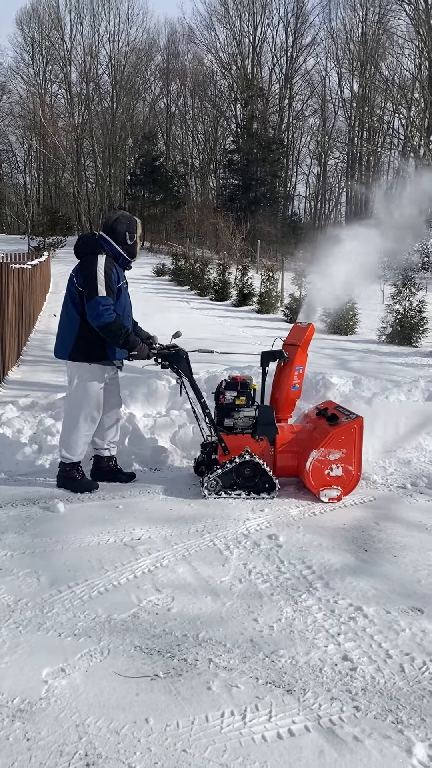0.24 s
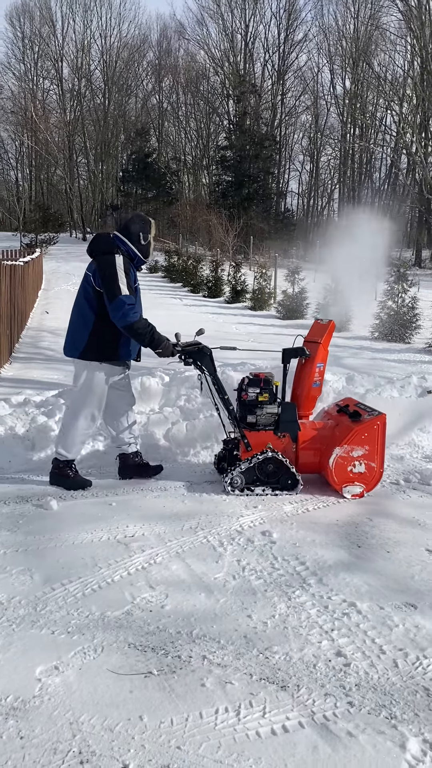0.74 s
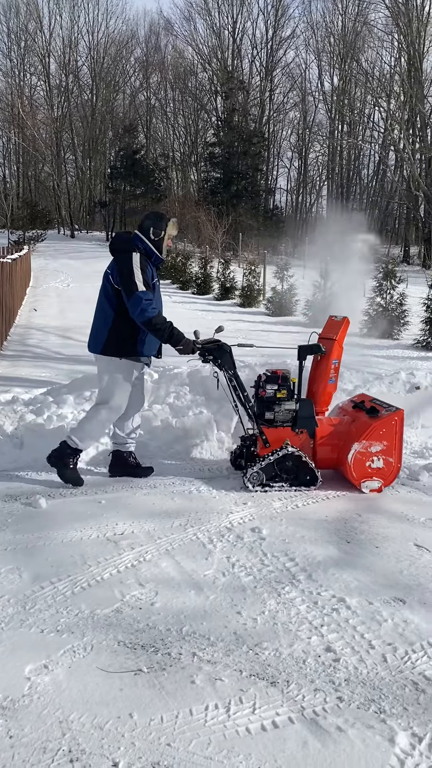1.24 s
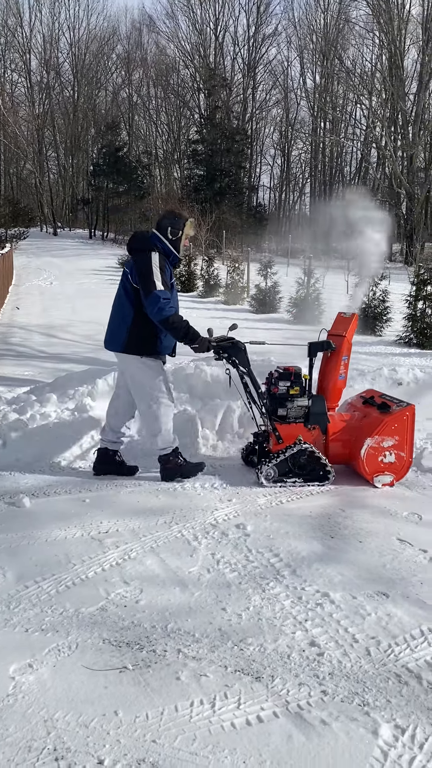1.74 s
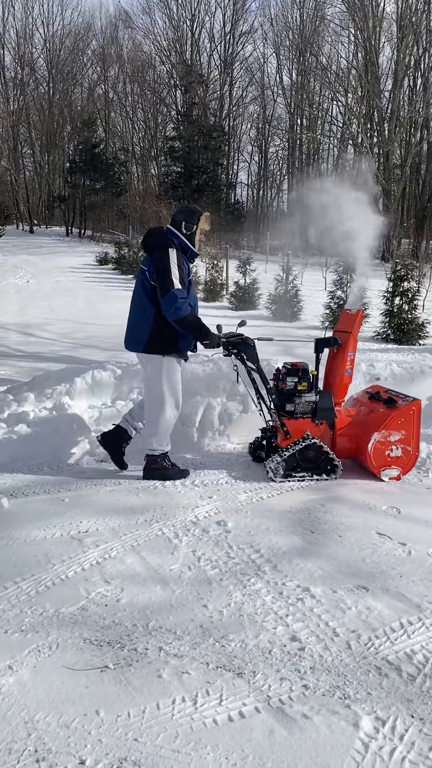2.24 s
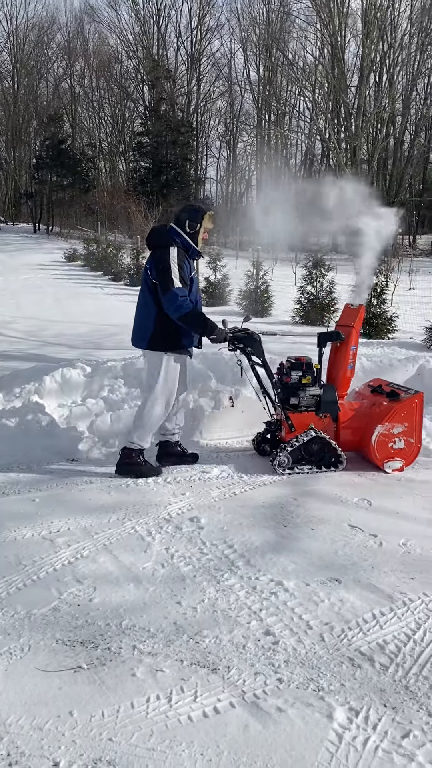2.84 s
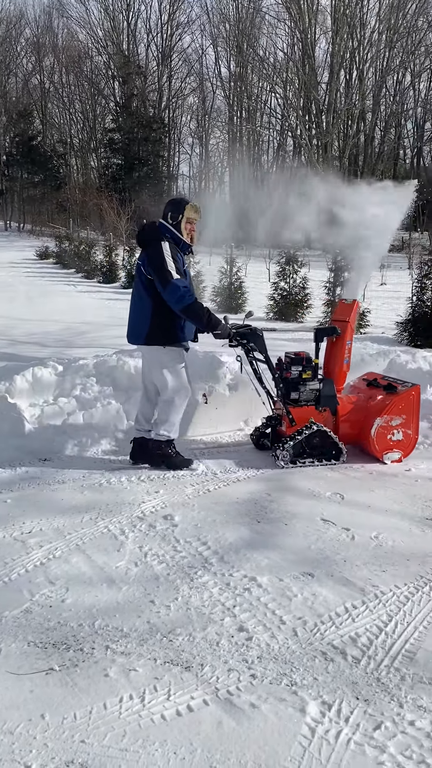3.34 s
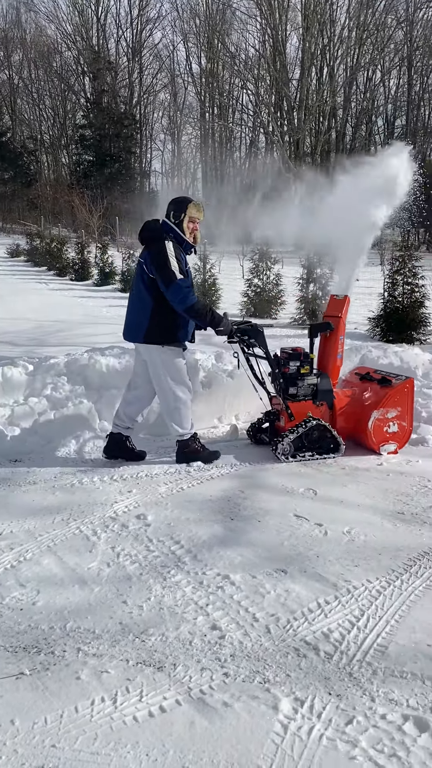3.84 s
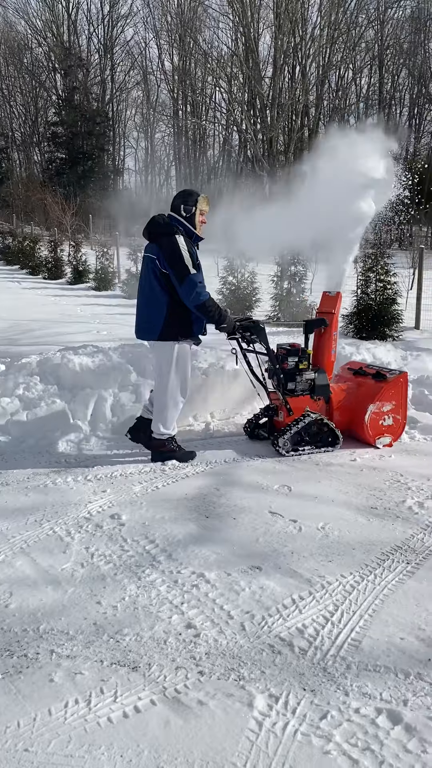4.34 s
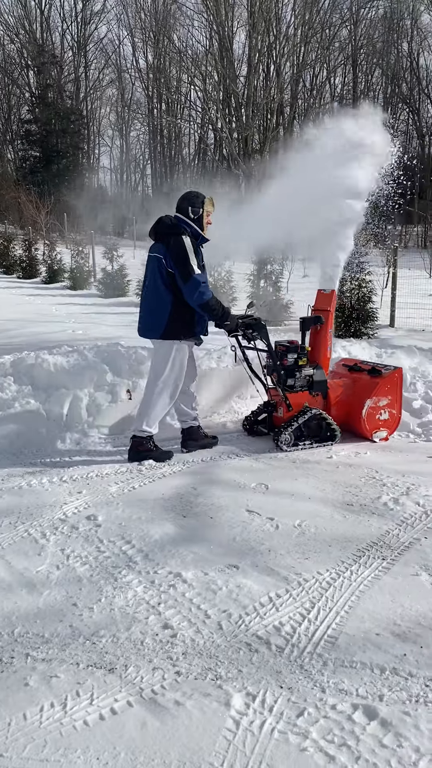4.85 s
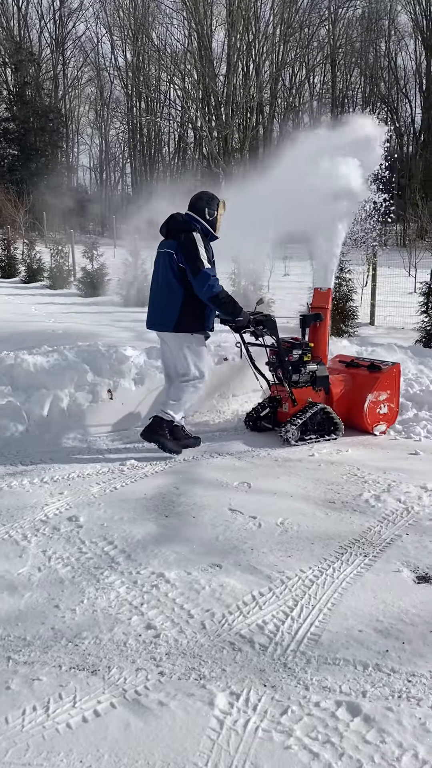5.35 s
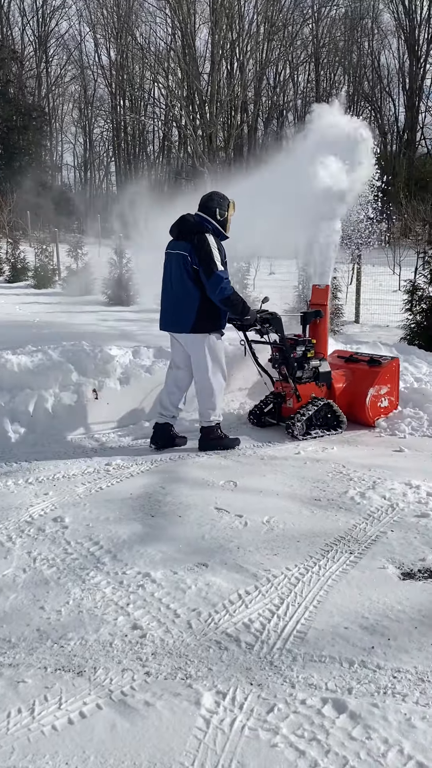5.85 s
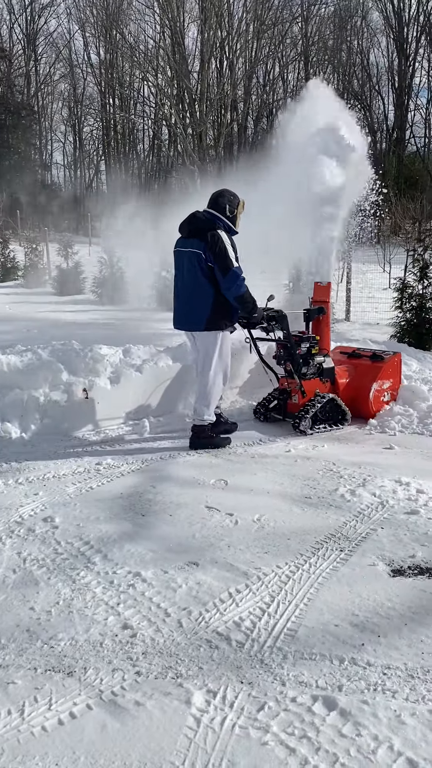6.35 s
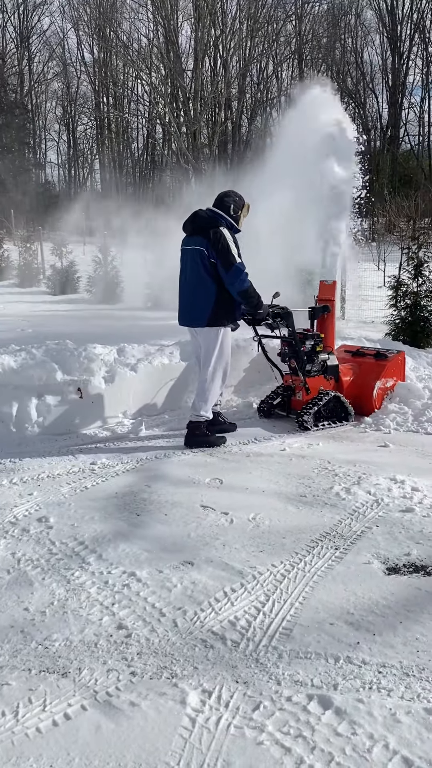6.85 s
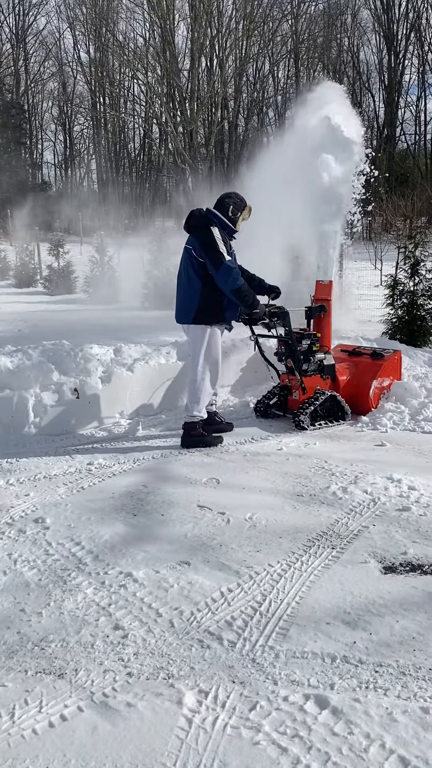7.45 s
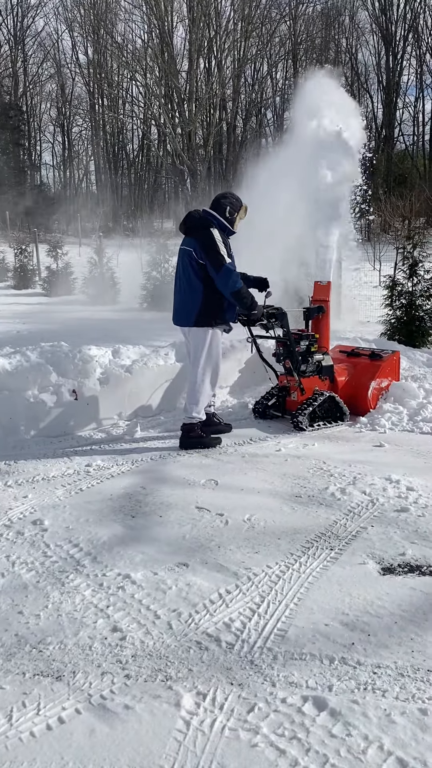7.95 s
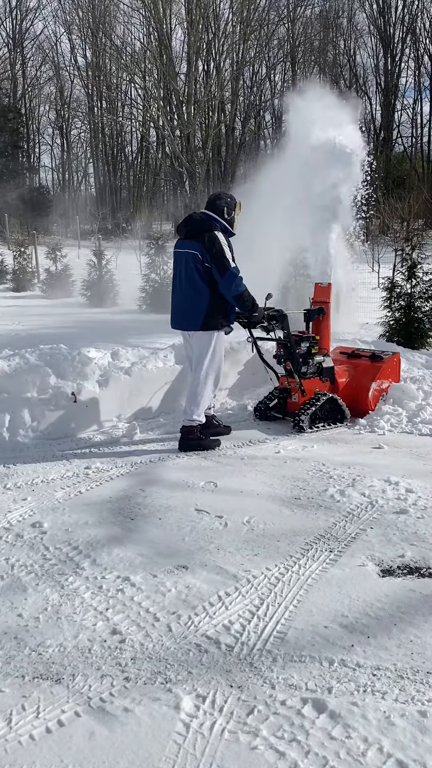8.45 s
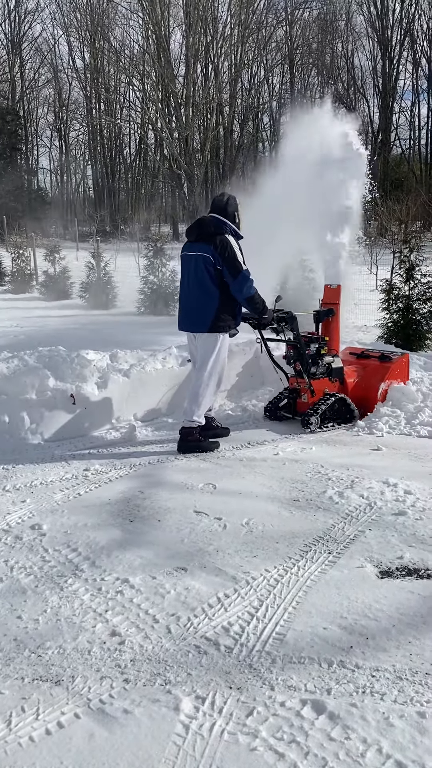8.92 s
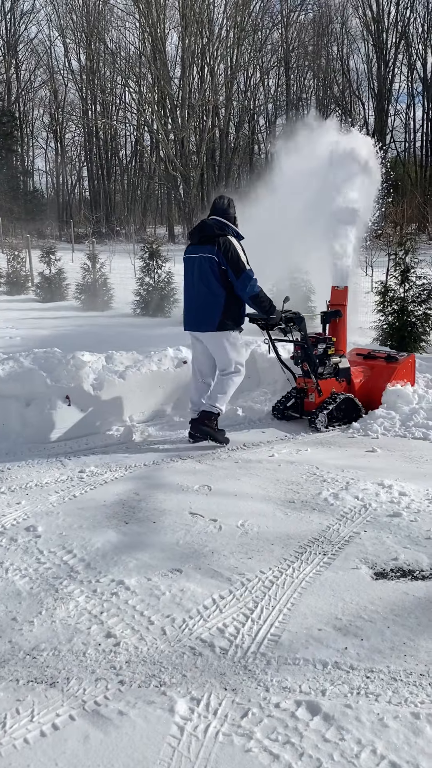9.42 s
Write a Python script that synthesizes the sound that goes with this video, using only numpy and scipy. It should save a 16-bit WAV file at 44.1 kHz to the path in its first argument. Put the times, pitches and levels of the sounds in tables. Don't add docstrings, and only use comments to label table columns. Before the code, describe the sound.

A single-cylinder snowblower throbs and clatters steadily outdoors, laboring louder as it digs into deeper snow, with hissing spray and sharp ice ticks on steel.

```python
import sys
import numpy as np
from scipy import signal
from scipy.fft import rfft, irfft, next_fast_len
from scipy.io import wavfile
from scipy.ndimage import uniform_filter1d, map_coordinates

SR = 44100
rng = np.random.default_rng(int(sys.argv[2]) if len(sys.argv) > 2 else 0)


def wav_out(sig):
    wavfile.write(sys.argv[1], SR, np.round(np.clip(np.atleast_2d(sig).T, -1, 1) * 32767).astype(np.int16))


def boost(x):
    u = np.asarray(x, float) / 20
    return 10 ** u


N = 426888
SIZE = next_fast_len(N + SR)
HZ = np.arange(SIZE // 2 + 1) * SR / SIZE + 1e-3


def rms_one(x):
    return x / np.sqrt(np.mean(x ** 2) + 1e-20)


def in_time(rows):
    seconds, *columns = np.transpose(rows)
    return [np.interp(np.arange(N) / SR, seconds, column) for column in columns]


def at_hz(points):
    points = np.array(points)
    return np.interp(np.log(HZ), np.log(points[:, 0]), points[:, 1])


def shape(x, gain):
    return irfft(rfft(x, SIZE) * gain, SIZE)[..., :N]


def coloured(x, points):
    return rms_one(shape(x, boost(at_hz(points))))


def drift(rate):
    knots = rng.standard_normal(800)
    at = np.arange(0, N + 64, 64)
    place = 5 + at / SR * np.clip(rate, .1, 70)
    return np.interp(np.arange(N), at, map_coordinates(knots, [place], order=3))


def resonate(x, hz, width):
    r = np.exp(-np.pi * width / SR)
    top = np.array([1, 0, -1]) * (1 - r * r) / 2
    bottom = [1, -2 * r * np.cos(2 * np.pi * hz / SR), r * r]
    return signal.lfilter(top, bottom, x)


def puff(cycle, at, decay, uneven_db):
    since = cycle - at
    strength = boost(uneven_db * rng.standard_normal(400))[np.floor(since).astype(int) + 2]
    part = since % 1
    return strength * np.minimum(part / 0.037, 1) * np.exp(-part / decay)


def swell(middle, half):
    return np.exp(-((np.arange(N) / SR - middle) / half) ** 2)


def muffler(cycle, rate, level_db, stage):
    # (multiple of firing rate, light work [dB], labouring [dB], deep snow [dB])
    multiples = [(1, -25.5, -36, -24), (2, -1, 1, 4), (3, -10, 2.5, 0.5), (4, -27, -2.5, -3.5),
                 (5, -3, -5, -1.5), (6, 0.5, -6, -5.5), (7, -2.5, -18, -5.5), (8, -13.5, -0.5, -7.5),
                 (9, -8, -9, -2.5), (10, -12, -9, -15), (11, -15, -37, -23), (12, -18, -25, -17),
                 (14, -19.5, -20.5, -37), (15, -31, -18, -14), (16, -36, -12.5, -25),
                 (17, -21.5, -14, -14.5), (18, -23, -14, -14), (19, -43, -12.5, -22), (20, -33, -19, -19),
                 (21, -17, -38, -30), (22, -13.5, -45, -30), (24, -15, -31, -39), (25, -20, -25, -27),
                 (26, -14, -37, -42), (27, -18.5, -37, -35), (28, -27, -35, -35), (29, -11.5, -32, -35)]
    # (frequency [Hz], half width [Hz], lift [dB])
    pipe = [(250.8, 13, 6), (485.5, 11, 2.5)]
    # (frequency [Hz], phase [radians])
    muffler_lead = [(50, 0), (92, 0), (105, 1.5), (128, -1.3), (203, 6.5), (225, 5.7), (265, 7.5),
                    (900, 40)]
    # (frequency [Hz], level [dB])
    rumble_colour = [(30, -26), (50, -3.5), (100, -3.5), (200, 1.5), (270, -1), (340, -12), (500, -20),
                     (900, -42)]
    tone = np.zeros(N)
    for order, *by_stage in multiples:
        order = round(order)
        order_db = np.interp(stage, [0, 1, 2], by_stage)
        order_db = order_db + sum(db / (1 + ((order * rate - hz) / width) ** 2) for hz, width, db in pipe)
        loose = min(.25 + .05 * order, .75)
        lead = np.interp(order * rate, *np.transpose(muffler_lead))
        lead += .3 * max(order - 10, 0) ** 2
        phase = 2 * np.pi * order * cycle + lead + .4 * loose * drift(5.0)
        tone += boost(order_db + 2.6 * loose * drift(5.0)) * np.cos(phase)
    power = uniform_filter1d(tone ** 2, SR // 3)
    gate = (.5 + 0.7 * puff(cycle, 0.586, 0.23, 2.5)) * boost(1.5 * drift(5.0))
    rumble = coloured(rng.standard_normal(N) * gate, rumble_colour)
    return boost(level_db) * (tone / np.sqrt(power) + boost(-8.0) * rumble)


def casing(cycle, level_db):
    # (frequency [Hz], level [dB])
    clatter_colour = [(250, -21), (330, -7), (440, -4), (600, -5.5), (820, -2), (1000, -3.5), (1100, -6.5),
                      (1600, -10.5), (2200, -14), (3050, -17), (3600, -19.5), (6000, -25.5), (10000, -43)]
    # (frequency [Hz], width [Hz], level [dB])
    panel_rings = [(2274, 22, -45.5), (2710, 100, -44), (3197, 120, -47), (3710, 300, -46.5),
                   (4210, 80, -60)]
    gate = 0.98 + 1.1 * puff(cycle, 0.529, 0.1, 4.8)
    gate += 0.33 * puff(cycle, 0.46, 0.053, 6.8)
    gate += 0.45 * puff(cycle, 0.3, 0.19, 2.6)
    shaken = rms_one(gate * rng.standard_normal((2, N)) * boost(0.58 * drift(12.0)))
    rings = 0
    for hz, width, db in panel_rings:
        rings = rings + boost(db) * rms_one(resonate(resonate(shaken, hz, width), hz, width))
    return boost(level_db + 4.5) * coloured(shaken, clatter_colour) + boost(level_db + 26.5) * rings


def rasp(cycle, level_db, stage):
    # (frequency [Hz], level [dB])
    gas_colour = [(300, -22), (470, -4.5), (600, -2.5), (950, -5.5), (1100, -8.5), (1250, 2.5), (1900, -10),
                  (2800, -5.5), (3400, -10), (4600, -10), (6500, -13), (9000, -17.5), (11000, -19),
                  (16000, -22)]
    load = np.clip(stage - .15, .05, .85)
    beats = 0.7 * puff(cycle, 0.1, 0.056, 2.2)
    beats += 1.2 * puff(cycle, 0.26, 0.17, 2.2) + 1.63 * puff(cycle, 0.365, 0.14, 2.0)
    gate = (.58 - 0.42 * load + load * beats) * boost(1.1 * drift(45.0))
    return boost(level_db + 2.5) * coloured(gate * rng.standard_normal((2, N)), gas_colour)


def spray(level_db):
    # (frequency [Hz], level [dB])
    snow_colour = [(1500, 5), (3000, 5.5), (5000, 0), (7500, 0), (11000, -4), (13000, -7), (16000, -24)]
    hits = rng.random(N) < 900.0 / SR
    grain = boost(4.0 * np.minimum(rng.exponential(1, N), 4)) * rng.choice([-1, 1], N)
    hiss = rng.standard_normal(N) + .5 * rms_one(hits * grain)
    clumps = boost(3.7 * drift(29.0) + 0.63 * drift(40.0))
    return boost(level_db + 5.5) * coloured(hiss * clumps, snow_colour)


def wind():
    # (middle [s], half length [s], level [dB])
    gusts = [(.18, .1, -34), (.72, .07, -42), (1.052, 0.076, -32), (1.3, 0.13, -38), (1.7, 0.16, -29),
             (1.93, .08, -35), (2.4, 0.19, -40), (3.0, 0.19, -32), (3.52, .07, -41), (4.27, 0.11, -42),
             (4.98, .07, -40), (5.3, .13, -44), (5.62, .04, -37), (6.08, .1, -38), (7.05, .1, -31),
             (7.28, .13, -35), (7.66, 0.15, -24), (7.85, 0.11, -26), (8.042, .08, -27), (8.4, 0.089, -28),
             (8.72, .11, -29), (9.0, 0.21, -37), (9.47, .04, -52)]
    calm_db = -68
    level = boost(calm_db) + sum(boost(db) * swell(middle, half) ** 2 for middle, half, db in gusts)
    low = boost(at_hz([(20, -22), (45, 0), (90, 0), (160, -5), (300, -15), (700, -40), (2500, -90)]))
    left, right, both = (rms_one(shape(rng.standard_normal(N) * boost(5.0 * drift(25.0)), low)) for _ in range(3))
    return level * (np.array([left, right]) + 1.9 * both)


def thud(shudder_db):
    boom_hz, width_hz = 336, 154
    boom = resonate(rng.standard_normal(N), boom_hz, width_hz)
    boom = resonate(boom, boom_hz, 2.5 * width_hz)
    return boost(-33.5) * shudder_db * rms_one(boom)


def chips():
    # (time [s], peak [dB], time to fall 60 dB [s], body knock [dB], chute ring [dB])
    ice_chips = [(2.2099, -18, 0.032, -5, -4.0), (2.74, -19, 0.05, 12, 0), (2.7866, -16.5, 0.026, 7, -1),
                 (2.9751, -22, 0.045, 11, 0), (3.0094, -22, 0.032, 8, -2), (3.4694, -23, 0.032, -4, -4.0),
                 (3.6601, -13, 0.032, -15, -2), (3.7204, -23, 0.032, 0, -4.0),
                 (3.9425, -16, 0.032, -17, -4.0), (4.1385, -21, 0.032, -8, 0),
                 (4.3066, -17.5, 0.029, 4, -7), (4.4446, -13.5, 0.032, -13, -6),
                 (5.0913, -10, 0.018, -20, -1), (5.222, -1.5, 0.035, -13, -1), (5.529, -13, 0.032, -1, -5),
                 (7.006, -18, 0.032, -3, -4.0), (7.2286, -19, 0.03, 8, -9), (7.2614, -14, 0.032, -9, -9),
                 (8.183, -2, 0.032, 4, 1), (8.1981, -8, 0.041, 14, 0), (8.2332, -13, 0.029, -8, -4.0),
                 (8.3062, -8, 0.024, -18, -11), (8.784, -11.5, 0.076, -11, -4.0)]
    # (frequency [Hz], width [Hz], level [dB])
    chute = [(1600, 500, -2), (2500, 600, 0), (4400, 700, 3), (5300, 500, -2), (9500, 2500, -5)]
    shatter_s = 0.004
    out, t = np.zeros(N), np.arange(SR // 8) / SR
    crack = signal.butter(2, 3300.0, "high", fs=SR, output="sos")
    body = signal.butter(2, [1300, 5400], "band", fs=SR, output="sos")
    for s, peak_db, t60, body_db, ring_db in ice_chips:
        noise = rng.standard_normal(len(t))
        fading = np.maximum(t - shatter_s * boost(peak_db / 2), 0)
        burst = noise * np.minimum(t / .0003, 1) * boost(-60 * fading / t60)
        rung = sum(boost(db + 8) * resonate(burst, hz, width) for hz, width, db in chute)
        high = signal.sosfilt(crack, .45 * burst + boost(ring_db) * rung)
        low = signal.sosfilt(body, rung + burst)
        chip = high / np.abs(high).max() + boost(body_db - 5) * low / np.abs(low).max()
        i = round(s * SR)
        out[i:i + len(t)] += boost(peak_db + 1.5) * chip
    return out


def duck():
    start_s, attack_s, hold_s, release_s, drop_db = 8.2, 0.041, .13, 0.21, -6
    corners = start_s + np.cumsum([0, attack_s, hold_s, release_s])
    return boost(np.interp(np.arange(N) / SR, corners, [0, drop_db, drop_db, 0]))


def ports(direct, other):
    # (frequency [Hz], left minus right [dB])
    left_louder = [(160, 0), (250, -.5), (400, .5), (650, 4), (840, 11.5), (1050, 7.5), (1400, 6),
                   (1750, 3.5), (2100, .5), (2900, 1.5), (3400, 4), (4300, -1), (5600, -.5), (6300, 0)]
    # (frequency [Hz], phase [radians])
    left_leads = [(0, 0.0), (300, .15), (500, .5), (740, .95), (900, .05), (1150, -.3), (1900, -.15),
                  (2400, .7), (2850, 1.0), (3500, .1), (4700, .3), (5300, .7)]
    # (frequency [Hz], share [0-1])
    unlike = [(200, 0), (600, .15), (850, .4), (1200, .3), (1650, .55), (2000, .1), (2500, .7), (2950, .85),
              (3800, .55), (5000, .6), (6300, .35), (6900, 0)]
    lag_s, lag_zero_hz = 1.613e-4, 4200
    hz, radians = np.transpose(left_leads)
    lead = np.where(HZ < hz[-1], np.interp(HZ, hz, radians), 2 * np.pi * (HZ - lag_zero_hz) * lag_s)
    own, shadow = at_hz(unlike), boost(-at_hz(left_louder))
    shared = shape(direct, shadow * np.sqrt(1 - own ** 2) * np.exp(-1j * lead))
    return np.array([direct, shared + shape(other, shadow * own)])


def scene():
    # (time [s], firing rate [firings/s])
    speed = [(0.0, 29.006), (2.8, 29.117), (3.2, 28.807), (4.6, 28.582), (4.8, 27.984), (5.0, 28.371),
             (5.8, 27.04), (6.2, 25.767), (6.4, 26.128), (6.6, 24.919), (7.2, 27.073), (7.8, 27.947),
             (8.0, 27.525), (8.2, 28.769), (8.6, 27.143), (8.8, 28.386), (9.2, 26.813), (9.68, 27.071)]
    # (time [s], level over light work [dB])
    work = [(0, 1.5), (.3, -1.5), (1.3, -0.7), (2.7, 0.7), (3.4, 0.4), (4.6, 2.5), (5.6, 4.5), (6.1, 7.5),
            (6.6, 7.5), (6.9, 8), (7.4, 7), (7.9, 5), (8.5, 4.5), (8.9, 1.5), (9.2, 5), (9.68, 5)]
    # (time [s], stage [0 light, 1 labouring, 2 deep])
    load_stages = [(0, 0.022), (3.6, 0.089), (4.6, 0.44), (5.5, 0.72), (6.1, 0.9), (6.85, 1.24),
                   (7.2, 1.85), (9.68, 1.78)]
    # (time [s], level [dB])
    lumps = [
        (1.4, 2.5),
        (2.84, 3.5),
        (4.07, 1.5),
        (4.33, 2),
        (4.5, 3),
        (5.53, 1.5),
        (6.95, 2.5),
        (7.87, 1.5),
    ]
    (rate,), (effort,), (stage,) = in_time(speed), in_time(work), in_time(load_stages)
    shudder = sum(db * swell(s, 0.074) for s, db in lumps)
    cycle = np.cumsum(rate) / SR + .51
    throb = muffler(cycle, rate, -16.5 + 0.29 * effort + 0.52 * shudder, stage)
    clatter = casing(cycle, -28.5 + 0.17 * effort + shudder)
    direct, other = clatter + rasp(cycle, -35 + 1.22 * effort, stage)
    direct = direct + throb + spray(-45 + 1.5 * effort) + thud(shudder) + chips()
    return ports(direct, other) + wind()


def roll_off(x):
    return signal.sosfilt(signal.butter(12, 16640, fs=SR, output="sos"), x)


def record(dry):
    x = signal.sosfilt(signal.butter(2, 35.0, "high", fs=SR, output="sos"), dry * duck())
    x = 1.3 * np.tanh(x / 1.3)
    x = signal.sosfilt(signal.ellip(10, .5, 30, 15800, fs=SR, output="sos"), x)
    return roll_off(x)


dry = scene()
out = record(dry)
wav_out(out)
```